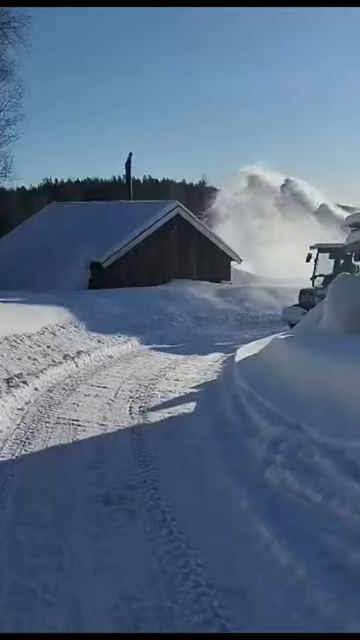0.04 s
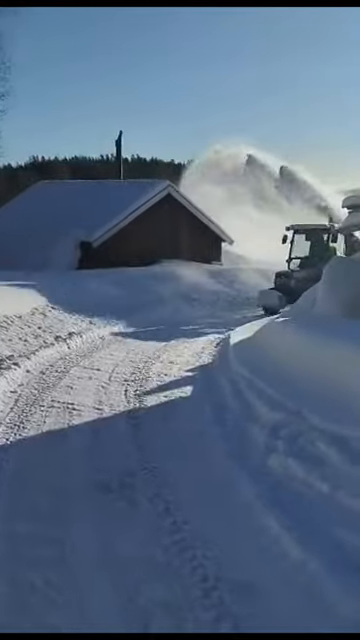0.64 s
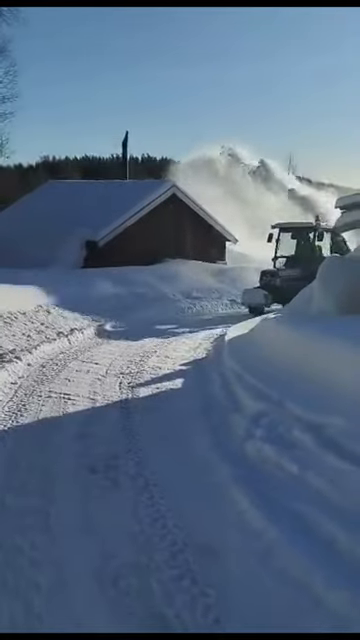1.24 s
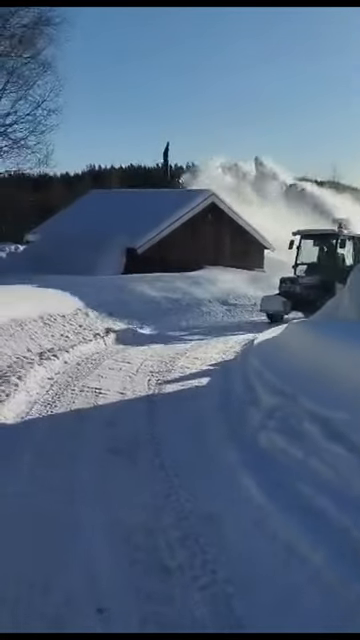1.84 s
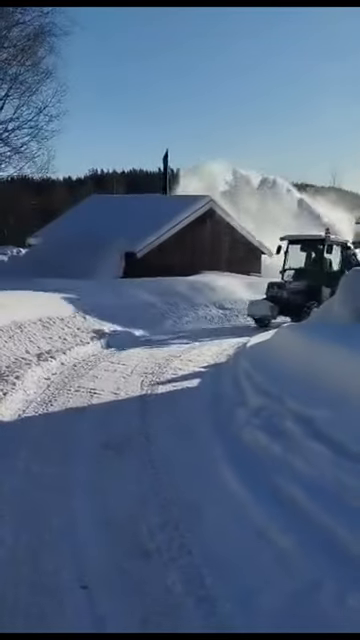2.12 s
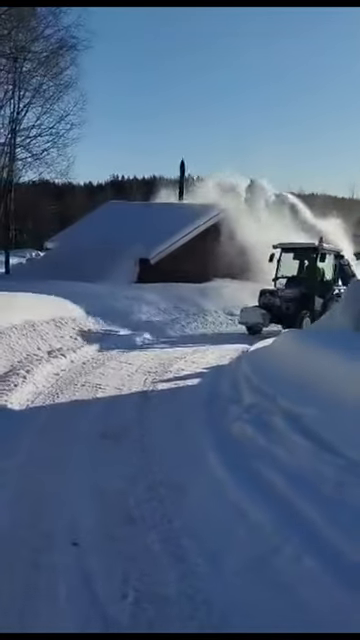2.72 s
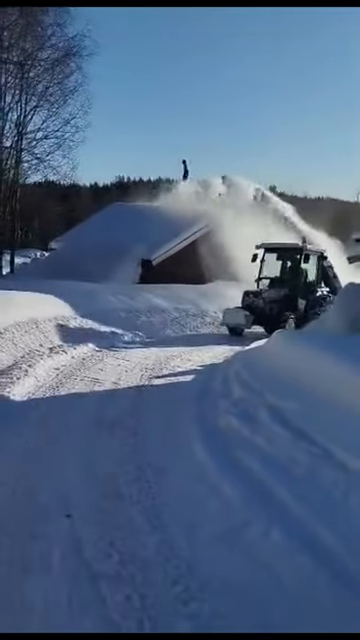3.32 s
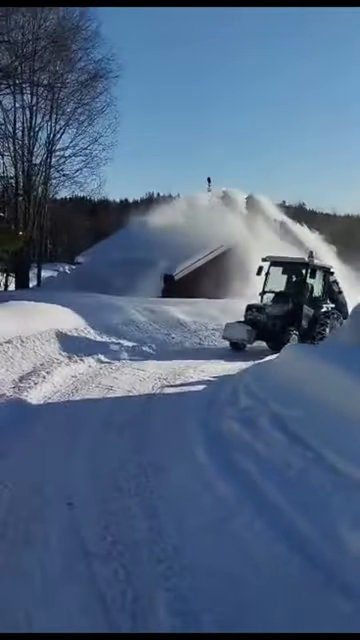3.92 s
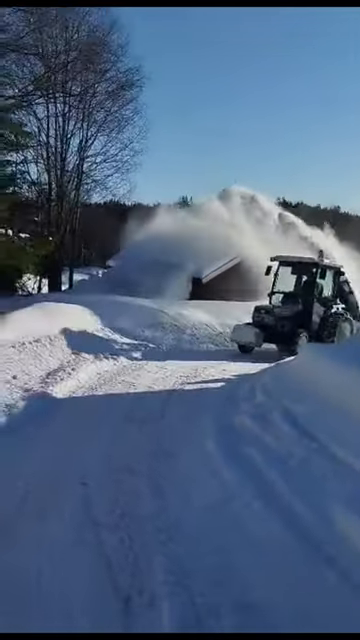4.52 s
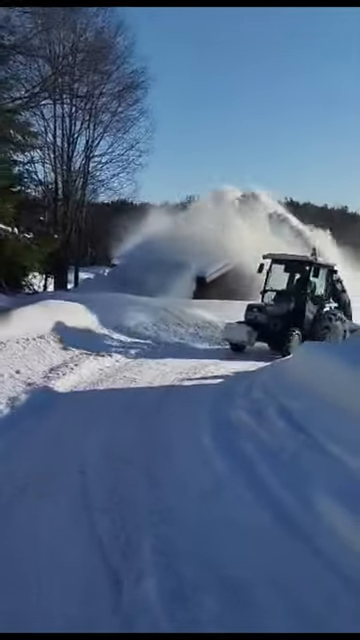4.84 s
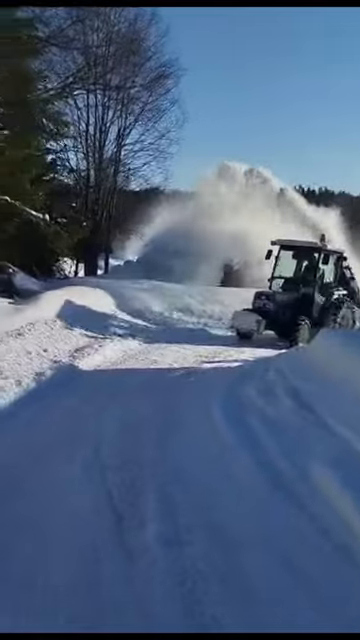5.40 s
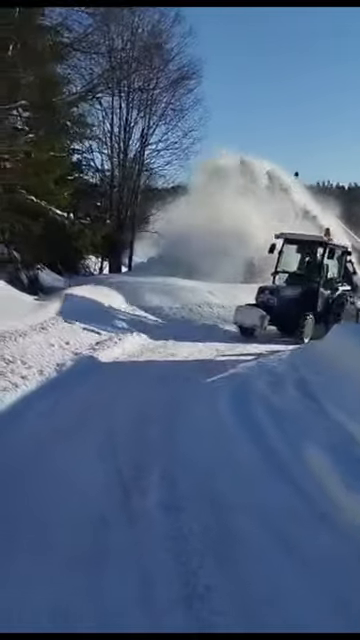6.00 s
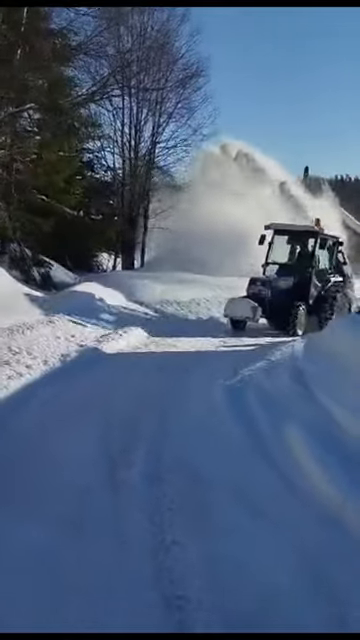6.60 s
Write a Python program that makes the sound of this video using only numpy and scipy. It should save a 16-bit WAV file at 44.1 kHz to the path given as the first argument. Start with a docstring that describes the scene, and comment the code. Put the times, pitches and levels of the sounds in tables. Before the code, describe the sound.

A compact diesel tractor runs at steady speed some way off outdoors, its low exhaust drone slowly growing louder as it creeps closer. Engine clatter becomes clearer, along with the churning hum of its snow blower and a faint hiss of thrown powder. Throughout, irregular wind gusts rumble, buffet and slap right on the microphone, first mostly on the right and later on the left, often rising above the machine.

```python
"""Snow-blowing tractor in gusty wind

A compact diesel tractor creeps closer along a snowy lane. Periodic firing drives the exhaust's
drone and the injection's clatter; the geared impeller churns and hums, ice ticks on the chute
and the plume of powder hisses. Turbulent gusts rumble, buffet and slap at the two microphone
ports, each on its own, and a gain control ducks the hardest of them."""
import sys
import numpy as np
from scipy import signal
from scipy.fft import rfft, irfft, next_fast_len
from scipy.io import wavfile
from scipy.ndimage import uniform_filter1d, minimum_filter1d

SR = 44100
rng = np.random.default_rng(int(sys.argv[2]) if len(sys.argv) > 2 else 0)


def pcm_store(signal):
    """Save signal as 16-bit PCM."""
    levels = np.round(np.clip(np.atleast_2d(signal), -1, 1) * 32767)
    wavfile.write(sys.argv[1], SR, levels.astype(np.int16).T)


N = 293706
TIME = np.arange(N) / SR
FFT_SIZE = next_fast_len(N, real=True)
BINS_HZ = np.fft.rfftfreq(FFT_SIZE, 1 / SR)


def from_db(db):
    """Amplitude ratio: a factor of ten for every 20 dB."""
    return 10 ** (np.asarray(db) / 20)


def unit_rms(x):
    """Normalisation to unit mean power."""
    return x / np.sqrt(np.mean(x ** 2) + 1e-20)


def in_time(rows):
    """Linear interpolation in time: one curve for each column after the first."""
    times, *columns = np.transpose(rows)
    return [np.interp(TIME, times, column) for column in columns]


def at_hz(points, hz):
    """Interpolation on a logarithmic frequency axis."""
    freqs, values = np.transpose(points)
    return np.interp(np.log(hz + 1), np.log(freqs), values)


def butter(x, hz, kind, order=2):
    """Causal Butterworth filtering, maximally flat in the passband."""
    return signal.sosfilt(signal.butter(order, hz, kind, fs=SR, output="sos"), x + 1e-18)


def drift(rate):
    """Low-pass Gaussian process of unit spread that changes about `rate` times a second."""
    pole = np.exp(-40 * np.pi * rate / SR)
    white = rng.standard_normal(N // 20 + 4002)
    slow = signal.lfilter([1], [1, -2 * pole, pole * pole], white)[4000:]
    return np.interp(np.arange(N) / 20, np.arange(len(slow)), unit_rms(slow))


def flutter(depth_db, rate):
    """Random amplitude modulation of unit power, its extremes softly limited."""
    return unit_rms(from_db(depth_db * 2 * np.tanh(drift(rate) / 2)))


def gust_envelope(gusts, release_s, attack_s=0.025):
    """Incoherent addition: gusts sum in power, each swelling, holding and decaying exponentially."""
    power = np.zeros(N)
    for start, hold, db in gusts:
        before = np.maximum(start - TIME, 0) / attack_s
        after = np.maximum(TIME - start - hold, 0) / release_s
        power += from_db(2 * db) * np.exp(-2 * np.minimum(before + after, 20))
    return np.sqrt(power)


def rumble(flow, band_hz=(14, 150), knee_hz=90, lumps_db=2.6):
    """Large-scale turbulence: uneven low-frequency pressure noise that grows with the flow."""
    noise = butter(rng.standard_normal(N), band_hz, "band", order=3)
    eddying = butter(noise, knee_hz, "low", order=1)
    return flow * unit_rms(eddying * from_db(lumps_db * drift(14.2)))


def turbulence_db(gust, eddies, calm_db=-56, swirl_db=-10.5, swirl_s=0.0055):
    """Intermittency: a gust comes in quick bursts, and each eddy brings a swirl of its own."""
    bursts = (gust + from_db(calm_db)) * flutter(depth_db=4.0, rate=50)
    swirls = np.zeros(N + SR)
    near = np.arange(-SR // 25, SR // 25)
    swirl = np.exp(-np.abs(near) / (swirl_s * SR))
    for time_s, db, _, _ in eddies:
        swirls[int(time_s * SR) + near] += from_db(db + swirl_db) * swirl
    return 20 * np.log10(np.hypot(bursts, swirls[:N]))


# Spectrum of air tumbling over a port: frequency_hz, density_db
BUFFET_SPECTRUM = [(140, 0.5), (220, -1.5), (330, -4.5), (500, -6), (750, -19), (1100, -38), (1600, -40),
                   (2600, -55)]

def buffeting(force_db, brighten=0.32, strong_db=-11.5):
    """Flow noise: the faster air tumbles over the port, the higher its spectrum reaches."""
    edges_hz = 125 * 2 ** (np.arange(10) / 2)
    white = rng.standard_normal((2, N))
    out, power = 0, 0
    for k, (low, high) in enumerate(zip(edges_hz, edges_hz[1:])):
        hz = np.sqrt(low * high)
        band = butter(white[k % 2], [low, high], "band", order=3) * from_db(at_hz(BUFFET_SPECTRUM, hz))
        tilt_db = brighten * np.log2(hz / 350) * (force_db - strong_db)
        out = out + band * from_db(force_db + tilt_db)
        power += np.mean(band ** 2)
    return out / np.sqrt(power)


EDDY_HZ, EDDY_S = 320, 0.0035  # pitch and length of an ordinary eddy

def lesser_eddies(gusts, per_s=10, over_db=1.0, spread_db=1.5):
    """Poisson process: small eddies arrive at random within each gust, in step with its strength."""
    arrivals = np.flatnonzero(rng.random(N) < per_s / SR)
    excess_db = over_db + spread_db * rng.standard_normal(N)
    return [(TIME[i], db + excess_db[i], EDDY_HZ, EDDY_S)
            for start, hold, db in gusts for i in arrivals if start < TIME[i] < start + hold]


def slaps(eddies, swell=0.44, fade=0.98, slowing=0.35, wobble=0.11, steepen=0.35,
          crack_s=0.00043, break_db=-5.5):
    """Damped oscillation: a passing eddy swings the pressure to a crest, then slows and dies away."""
    out = np.zeros(N + SR)
    offsets = np.arange(-SR // 30, SR // 30)
    t = offsets / SR
    crack = -0.4 * t / crack_s * np.exp(-(t / crack_s) ** 2)
    polarity = rng.choice([-1, 1], N)
    unsteady = drift(115)
    crackle = from_db(-20.5) * unit_rms(butter(rng.standard_normal(N), (520, 1130), "band", order=3))
    for time_s, db, hz, length_s in eddies:
        at = int(time_s * SR)
        span = at + offsets
        age = np.maximum(t, 0) / length_s
        crest = np.exp(np.minimum(t, 0) / (swell * length_s) - age / fade)
        phase = 2 * np.pi * (hz * t / (1 + age) ** slowing + wobble * unsteady[span % N])
        swing = np.cos(phase + steepen * crest * np.cos(phase))
        # fast, strong eddies break up with a crack and a crackle
        breaking = (hz / EDDY_HZ) ** 2 * from_db(0.8 * min(db - break_db, 0))
        burst = crack + crest * crackle[span % N]
        out[span] += polarity[at] * from_db(db) * (crest * swing + breaking * burst)
    return butter(out[:N], 1800, "low", order=4)


# Rumble of the breeze between gusts: time_s, left_db, right_db
BREEZE_LEVELS = [(0.15, -30, -34), (0.5, -30, -22.5), (0.9, -21, -24), (1.3, -30, -30), (1.999, -29.5, -24),
                 (2.6, -25.5, -12), (2.95, -30, -34), (3.302, -39, -35), (4.35, -29.5, -35),
                 (5.2, -19, -27), (5.9, -24.5, -27.5), (6.66, -37, -30)]
# Gusts reaching a port: start_s, hold_s, rumble_db, buffeting_db, port
WIND_GUSTS = [(0.123, 0.097, -39, -18, "right"), (0.239, 0.1, -18.5, -20, "right"),
              (0.247, 0.041, -19, -33, "left"), (0.488, 0.016, -28, -38, "right"),
              (1.34, 0.18, -20.5, -29, "right"), (1.6, 0.14, -13.5, -22, "right"),
              (1.608, 0.024, -17.5, -18, "left"), (1.755, 0.11, -16.5, -26.5, "left"),
              (1.763, 0.23, -24, -30.5, "right"), (2.12, 0.063, -24, -22.5, "left"),
              (2.059, 0.015, -13, -17, "right"), (2.15, 0.21, -17.5, -22, "right"),
              (2.221, 0.23, -17, -19.5, "left"), (2.268, 0.043, -14, -5, "right"),
              (2.408, 0.05, -26, -16, "right"), (2.5, 0.07, -19.5, -14.5, "right"),
              (2.6, 0.16, -29, -17.5, "right"), (2.646, 0.18, -17, -19, "left"),
              (2.99, 0.13, -16, -31.5, "left"), (3.466, 0.27, -25, -67, "left"),
              (3.717, 0.085, -18.5, -20.5, "left"), (3.79, 0.17, -19.5, -28, "left"),
              (4.368, 0.025, -18.5, -27.5, "left"), (4.548, 0.087, -15.5, -17, "left"),
              (4.6, 0.57, -35, -35, "right"), (4.704, 0.68, -20, -23, "left"),
              (5.023, 0.083, -10.5, -15, "left"), (5.17, 0.2, -32, -35.5, "right"),
              (5.31, 0.14, -29, -22.5, "left"), (5.392, 0.039, -7.5, -9, "right"),
              (5.5, 0.041, -24, -33, "right"), (5.603, 0.17, -12.5, -17, "left"),
              (6.106, 0.16, -14.5, -17, "left"), (6.422, 0.04, -27, -28.5, "left"),
              (6.57, .08, -34, -33, "right"), (6.605, .06, -15, -16, "left")]
# The hardest eddies slapping a port: crest_s, level_db, pitch_hz, length_s, port
HARD_EDDIES = [(0.137, -4.5, 585, 0.0004, "right"), (0.145, -12, 560, 0.0045, "right"),
               (0.209, -12, 540, 0.0038, "right"), (0.243, -14, 480, 0.0025, "right"),
               (0.249, -10, 400, 0.0026, "right"), (0.328, -12, 310, 0.0063, "right"),
               (0.362, -15, 357, 0.0081, "right"), (0.476, -12.5, 340, 0.0051, "right"),
               (0.499, -12, 323, 0.0069, "right"), (0.593, -22, 333, 0.0052, "right"),
               (0.715, -8, 370, 0.0021, "right"), (1.147, -22, 327, 0.0057, "left"),
               (1.191, -14, 267, 0.004, "right"), (1.341, -17, 283, 0.0093, "right"),
               (1.385, -13.5, 250, 0.0054, "right"), (1.478, -10, 440, 0.0028, "right"),
               (1.514, -15, 423, 0.0029, "right"), (1.537, -13.5, 426, 0.0046, "right"),
               (1.585, -11.5, 430, 0.0022, "right"), (1.6, -16, 377, 0.0039, "right"),
               (1.623, -6, 326, 0.004, "right"), (1.633, -5.5, 330, 0.0044, "right"),
               (1.648, -12, 380, 0.0029, "right"), (1.652, -13, 350, .005, "left"),
               (1.668, -4, 230, 0.0041, "right"), (1.71, -8, 350, 0.003, "right"),
               (1.657, -5, 300, 0.003, "right"), (1.682, 4.5, 387, 0.0024, "right"),
               (1.698, -9, 382, 0.006, "left"), (1.86, -16, 280, 0.01, "right"),
               (1.896, -9.5, 310, 0.0057, "right"), (1.985, -15, 262, 0.0057, "right"),
               (2.073, -9, 368, 0.0078, "right"), (2.078, -6.5, 513, 0.0018, "right"),
               (2.089, -15, 494, 0.003, "right"), (2.165, -12, 382, 0.0036, "left"),
               (2.215, -14, 420, 0.0045, "left"), (2.238, -10.5, 350, 0.0056, "right"),
               (2.272, -3, 476, 0.0029, "right"), (2.281, -19, 400, 0.0035, "left"),
               (2.293, -12, 400, 0.0034, "left"), (2.305, -8, 530, 0.0016, "right"),
               (2.326, -4, 490, 0.001, "left"), (2.337, -3, 276, 0.011, "left"),
               (2.447, -6, 380, 0.005, "right"), (2.48, -9, 220, 0.0038, "right"),
               (2.502, -4, 596, 0.0042, "right"), (2.51, -4, 450, 0.0027, "right"),
               (2.559, -3, 247, 0.0038, "right"), (2.587, -11, 350, 0.0016, "right"),
               (2.636, -10.5, 330, 0.005, "left"), (2.659, -5, 250, 0.0038, "left"),
               (2.669, -7, 400, 0.0031, "right"), (2.673, -15, 416, 0.003, "left"),
               (2.69, -6.5, 308, 0.0022, "right"), (2.699, -8, 413, 0.0026, "left"),
               (2.723, -7, 494, 0.0031, "right"), (2.734, -6.5, 495, 0.0035, "right"),
               (2.769, -2, 390, 0.006, "right"), (2.818, -12.5, 272, 0.012, "left"),
               (2.837, -6.5, 320, 0.002, "left"), (2.987, -11, 282, 0.0054, "left"),
               (3.075, -8.5, 297, 0.0023, "left"), (3.09, -15.5, 380, 0.0052, "left"),
               (3.718, -5, 540, 0.0024, "left"), (3.736, -17, 450, 0.0022, "left"),
               (3.742, -4.5, 630, 0.0032, "left"), (3.747, -10, 550, 0.0043, "left"),
               (3.792, -13.5, 374, 0.0039, "left"), (3.839, -8, 390, 0.0013, "left"),
               (3.849, -11.5, 396, 0.0021, "left"), (3.853, -10.5, 594, 0.0014, "left"),
               (3.883, -17, 454, 0.0033, "left"), (3.930, -9.5, 385, 0.0023, "left"),
               (4.012, -18, 332, 0.0038, "left"), (4.401, -13.5, 333, 0.0038, "left"),
               (4.551, -5, 560, 0.0029, "left"), (4.588, -2.5, 450, 0.0046, "left"),
               (4.639, -9.5, 377, 0.0069, "right"), (4.666, -7, 327, 0.0065, "left"),
               (4.791, -12, 430, 0.0024, "left"), (4.814, -12.5, 284, 0.0096, "left"),
               (4.873, -7.5, 374, 0.0037, "left"), (4.923, -5.5, 300, 0.0065, "left"),
               (4.956, -14, 300, 0.004, "left"), (5.026, -3, 473, 0.0026, "left"),
               (5.072, -11, 328, 0.0089, "left"), (5.104, -6.5, 420, 0.0076, "left"),
               (5.124, -7, 340, 0.0054, "left"), (5.168, -11, 426, 0.002, "left"),
               (5.227, -7.5, 335, 0.0025, "left"), (5.352, -12, 340, 0.0055, "right"),
               (5.382, 4, 330, 0.0033, "left"), (5.391, -7, 277, 0.027, "right"),
               (5.399, -13, 380, 0.0036, "right"), (5.412, -10, 350, 0.004, "left"),
               (5.417, -3, 565, 0.002, "right"), (5.426, -4, 436, 0.012, "right"),
               (5.513, -5, 262, 0.0065, "right"), (5.58, -3.5, 360, 0.0018, "left"),
               (5.602, -14, 350, 0.0055, "left"), (5.648, -11, 350, 0.0056, "left"),
               (5.693, -10.5, 241, 0.012, "left"), (5.698, -14, 403, 0.004, "left"),
               (5.733, -9.5, 314, 0.0071, "left"), (5.752, -18, 400, 0.0016, "left"),
               (5.76, 1, 257, 0.0032, "left"), (5.815, -15, 400, 0.0036, "left"),
               (6.06, -13, 273, 0.0057, "left"), (6.134, -5, 413, 0.0034, "left"),
               (6.155, -3.5, 350, 0.0042, "left"), (6.179, -13, 375, 0.0064, "left"),
               (6.229, -10, 438, 0.0046, "left"), (6.298, -12.5, 438, 0.0068, "left"),
               (6.478, -15.5, 248, 0.0073, "left"), (6.606, -15, 414, 0.0033, "left"),
               (6.639, -13.5, 370, 0.0052, "left"), (6.647, -7.5, 470, 0.0023, "left")]

def wind(port, buffet_gain_db=-2.8, slap_gain_db=3.3):
    """Pseudo-sound: turbulent pressure is local, so each port has its own rumble, buffets and slaps."""
    left_db, right_db = in_time(BREEZE_LEVELS)
    breeze = from_db(left_db if port == "left" else right_db)
    rumbles = [(start, hold, db) for start, hold, db, _, side in WIND_GUSTS if side == port]
    buffets = [(start, hold, db) for start, hold, _, db, side in WIND_GUSTS if side == port]
    eddies = [eddy for *eddy, side in HARD_EDDIES if side == port] + lesser_eddies(buffets)
    rumbling = rumble(np.hypot(breeze, gust_envelope(rumbles, release_s=0.043)))
    force_db = turbulence_db(gust_envelope(buffets, release_s=0.053), eddies)
    bursts = from_db(buffet_gain_db) * buffeting(force_db)
    return rumbling + bursts + from_db(slap_gain_db) * slaps(eddies)


# Likeness of the tractor's noise at the two ports: frequency_hz, coherence_ratio
PORT_COHERENCE = [(60, 1), (1900, 0.99), (2600, 0.75), (3900, 0.94), (4700, 0.42), (6800, 0.73),
                  (8200, 0.56), (10000, 0.1)]
# Phase by which the left port leads: frequency_hz, lead_rad
PORT_PHASE = [(900, 0), (1400, .7), (1800, 0), (2250, .2), (2800, .95), (3400, 2.5), (3800, 3.14),
              (9000, 3.1), (10500, 1.5)]
# Level difference between the ports: frequency_hz, left_minus_right_db
PORT_BALANCE = [(400, -2), (650, 12.5), (950, -5.5), (1350, -2), (1700, 6), (2200, -2.5), (2750, -8.5),
                (3300, -5), (3900, -1), (15000, -4)]

def tractor_noise(spectrum):
    """Partial coherence: coloured noise of unit power reaches the ports unequal in level and phase."""
    mid, side = rfft(rng.standard_normal((2, FFT_SIZE)))
    sign = np.array([[1], [-1]])  # left, right
    coherence = at_hz(PORT_COHERENCE, BINS_HZ)
    pair = np.sqrt(1 + coherence) * mid + sign * np.sqrt(1 - coherence) * side
    gain = from_db(at_hz(spectrum, BINS_HZ) + sign * at_hz(PORT_BALANCE, BINS_HZ) / 2)
    phase_shift = np.exp(0.5j * sign * at_hz(PORT_PHASE, BINS_HZ))
    return unit_rms(irfft(pair * gain * phase_shift)[:, :N])


def firing_pulse(firings, late, decay, depth, uneven_db, rise_hz=800):
    """Amplitude modulation: one uneven burst a firing over a steady floor; late and decay in cycles."""
    cycle, within = np.divmod(firings - late + 1, 1)
    strengths = from_db(uneven_db * np.tanh(rng.standard_normal(N // 100)))
    bursts = strengths[cycle.astype(int)] * np.exp(-within / decay)
    return unit_rms(1 + depth * butter(bursts, rise_hz, "low"))


def hum(cycles, harmonics, waver_db):
    """Fourier series: a steep periodic pressure wave whose partials waver in the moving air."""
    return -np.sqrt(2) * sum(from_db(db + waver_db * drift(20)) * np.sin(2 * np.pi * k * cycles)
                             for k, db in harmonics)


# Lumps of ice striking the chute: start_s, level_db
ICE_IMPACTS = [(2.828, -37), (3.2625, -44), (5.3198, -41), (6.2986, -38)]

def ice(gain_db=-11, decay_s=0.005, band_hz=(4500, 13000)):
    """Impact noise: hard lumps shatter on the chute, each a faint, bright, fast-decaying tick."""
    hits = np.zeros(N)
    for start, db in ICE_IMPACTS:
        hits[int(start * SR)] = from_db(db + gain_db)
    envelope = signal.lfilter([1], [1, -np.exp(-1 / (decay_s * SR))], hits + 1e-18)
    return envelope * unit_rms(butter(rng.standard_normal((2, N)), band_hz, "band"))


# Spectrum of the thrown powder: frequency_hz, density_db
PLUME_SPECTRUM = [(2000, -10.5), (3600, 2.5), (4700, 7), (6000, -1), (7200, 1.5), (9400, -7), (10600, -21),
                  (12300, -12.5), (14200, -29), (15700, -15.5)]
# Treble bands that flutter separately, like the watery warble of compressed audio: edge_hz
WARBLE_EDGES = (0, 4200, 5000, 5800, 6600, 7400, 8200, 9200, 11000, 13500, 22000)
# Rise and fall of the hiss around 7 kHz: time_s, gain_db
SIZZLE_GAIN = [(0.3, 3), (1.5, -2), (2.9, -2), (3.4, -3), (4.5, -7), (5.0, -0.5), (6.66, 0.5)]

def plume(firings, level_db, gain_db=6, sizzle_hz=(5800, 8200), warble_db=2.4, surge_db=1.0):
    """Granular noise: gritty powder hisses out of the chute, pulsing a little with the engine."""
    throb = firing_pulse(firings, late=0.098, decay=1.0, depth=0.35, uneven_db=5, rise_hz=150)
    grit = flutter(depth_db=1.7, rate=200)
    spray = rfft(tractor_noise(PLUME_SPECTRUM), FFT_SIZE)
    hiss = 0
    for low, high in zip(WARBLE_EDGES, WARBLE_EDGES[1:]):
        band = irfft(spray * (BINS_HZ >= low) * (BINS_HZ < high))[:, :N]
        sizzle_db = in_time(SIZZLE_GAIN)[0] if sizzle_hz[0] <= low < sizzle_hz[1] else 0
        hiss = hiss + band * from_db(sizzle_db + warble_db * drift(11))
    return from_db(level_db + gain_db + surge_db * drift(28)) * hiss * throb * grit


# Resonances of the impeller's steel housing: frequency_hz, density_db
HOUSING_SPECTRUM = [(350, -38), (500, -0.5), (650, -10), (790, 5), (950, 1), (1100, -0.5), (1280, 0.5),
                    (1420, 1.5), (1530, -9), (2200, -7.5), (4000, -45)]
# Harmonics of the blade-passing rate: harmonic_number, level_db
BLADE_HARMONICS = [(1, -23), (5, -14), (7, -20), (14, -35.5)]
# Churn and hum as the blower nears and takes in snow: time_s, level_db
BLOWER_LOAD = [(0.13, -52), (0.5, -53.5), (1.5, -50.5), (2.4, -49.5), (3.0, -47), (3.6, -44), (4.4, -46),
               (5.4, -43.5), (5.8, -44.5), (6.66, -41)]

def impeller(firings, blades_per_firing=0.831, blade_count=4, churn_db=3.5, hum_db=15):
    """Forced vibration: geared blades hum; the housing booms with the engine as snow churns through."""
    blade_passes = firings * blades_per_firing
    throb = firing_pulse(firings, late=-0.072, decay=0.88, depth=0.6, uneven_db=6)
    turns = blade_passes / blade_count + 0.15 * drift(1.4)
    swell_db = 1.7 * np.sin(2 * np.pi * turns)  # uneven scooping swells once a turn
    lumps_db = -0.5 * drift(17)
    churn = from_db(churn_db + swell_db + lumps_db) * tractor_noise(HOUSING_SPECTRUM) * throb
    blades = from_db(hum_db) * hum(blade_passes, BLADE_HARMONICS, waver_db=3.5)
    return from_db(in_time(BLOWER_LOAD)[0]) * (churn + blades)


# Spectrum of the rattling block and panels: frequency_hz, density_db
CLATTER_SPECTRUM = [(700, -12.5), (1600, -5), (2000, -3), (2350, -1.5), (2640, 1), (2735, 4.5), (2820, 0),
                    (2980, -1.5), (3200, 1.5), (3600, -11.5), (4500, -24.5), (8000, -34.5), (16000, -52.5)]

def clatter(firings, level_db, gain_db=1.0, flicker_db=1.1):
    """Impulsive excitation: diesel knock rattles the block and panels once a firing."""
    knocks = firing_pulse(firings, late=0.01, decay=0.5, depth=0.8, uneven_db=4.5)
    gain = from_db(level_db + gain_db + flicker_db * drift(24))
    return gain * tractor_noise(CLATTER_SPECTRUM) * knocks


# Harmonics of the firing rate: harmonic_number, level_db
EXHAUST_HARMONICS = [(1, -1.7), (2, 1), (3, -8.5), (4, -16), (5, -21.5), (6, -25), (7, -25), (8, -28),
                     (9, -28), (12, -30), (13, -32), (14, -29), (15, -28), (18, -31), (21, -33)]
# Spectrum of the turbulent exhaust gas: frequency_hz, density_db
ROAR_SPECTRUM = [(20, -14), (45, -5), (130, -1.5), (200, 0.5), (290, -2), (380, -9.5), (470, -20),
                 (650, -19.5), (1200, -61)]
# Drone of the exhaust: time_s, level_db
EXHAUST_LEVEL = [(0, -33.5), (1.2, -30.5), (2.3, -28), (3.3, -29), (4.3, -28), (5.4, -26), (5.9, -27.5),
                 (6.66, -26.5)]

def exhaust(firings, roar_db=-7, jitter_cycles=0.006):
    """Pulsating flow: each firing sends a pressure wave and a puff of turbulent gas out of the pipe."""
    tone = hum(firings + jitter_cycles * drift(20), EXHAUST_HARMONICS, waver_db=1.1)
    roar = from_db(roar_db) * tractor_noise(ROAR_SPECTRUM)
    puffs = firing_pulse(firings, late=-0.11, decay=0.17, depth=0.9, uneven_db=3)
    return from_db(in_time(EXHAUST_LEVEL)[0]) * (tone + roar * puffs)


# Engine speed: time_s, firing_rate_hz
FIRING_RATE = [(0, 67.3), (0.6, 67.8), (1.3, 67.8), (1.7, 67.1), (2.0, 66.4), (2.4, 66.9), (3.2, 66.8),
               (4.5, 66.7), (5.0, 67.5), (5.4, 67.5), (6.1, 67.6), (6.66, 67.1)]
# Clatter as the tractor nears and clears the snowbank: time_s, level_db
CLATTER_LEVEL = [(0.3, -59), (0.55, -53.5), (1.4, -53), (2.0, -51), (2.45, -47), (3.2, -46), (4.35, -46),
                 (4.7, -43), (5.6, -40), (6.66, -40)]

def scene():
    """Superposition: the tractor some way off, the wind right at the microphone."""
    firings = np.cumsum(in_time(FIRING_RATE)[0]) / SR
    clatter_db = in_time(CLATTER_LEVEL)[0]
    # the high plume is less screened, so it follows only part of the clatter's rise
    hiss_db = -57 + 0.37 * (clatter_db - clatter_db.mean())
    engine = exhaust(firings) + clatter(firings, clatter_db)
    blower = impeller(firings) + plume(firings, hiss_db) + ice()
    return engine + blower + np.array([wind("left"), wind("right")])


def gain_control(x, threshold_db=-15.5, squeeze=0.81, release_db_per_s=91, linked=0.26,
                 window_s=0.055, lag_s=0.016):
    """Dynamic compression: hard buffeting turns its own channel down, and the other one in part."""
    power = uniform_filter1d(butter(x, 200, "high") ** 2, size=int(window_s * SR))
    late_power = np.pad(power, ((0, 0), (int(lag_s * SR), 0)))[:, :N]
    over_db = np.maximum(10 * np.log10(np.abs(late_power) + 1e-12) - threshold_db, 0)
    release_db = release_db_per_s * TIME
    held_db = np.maximum.accumulate(over_db + release_db, axis=1) - release_db
    return x * from_db(-squeeze * np.maximum(held_db, linked * held_db[::-1]))


def record(dry, opens_s=0.13, opening_db=-7, fade_up_s=0.17, ceiling=0.88, cutoff_hz=15800):
    """Dynamic and band limiting: the microphone fades up, gusts are ducked, crests and treble cut."""
    gate = np.clip(np.minimum(TIME - opens_s, TIME[-1] - TIME) / 0.004, 0, 1)
    fade_up = from_db(opening_db * np.clip(1 - (TIME - opens_s) / fade_up_s, 0, 1))
    opened = gain_control(dry) * gate * fade_up
    allowed_gain = np.minimum(1, ceiling / (np.abs(opened) + 1e-9))
    limiter_gain = uniform_filter1d(minimum_filter1d(allowed_gain, size=89), size=89)
    low_pass = signal.ellip(10, 0.1, 80, cutoff_hz, fs=SR, output="sos")
    return signal.sosfilt(low_pass, opened * limiter_gain)


dry = scene()
out = record(dry)
pcm_store(out)
```